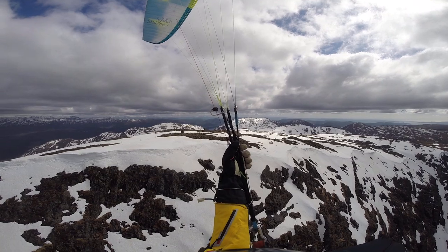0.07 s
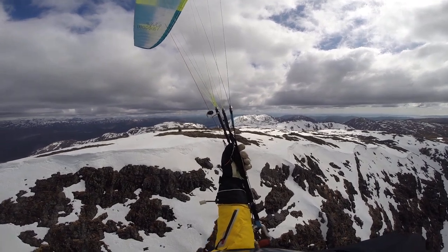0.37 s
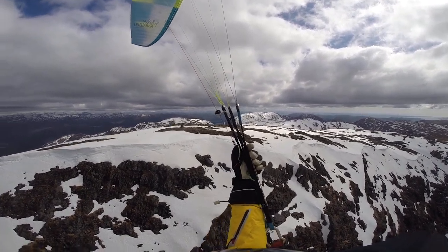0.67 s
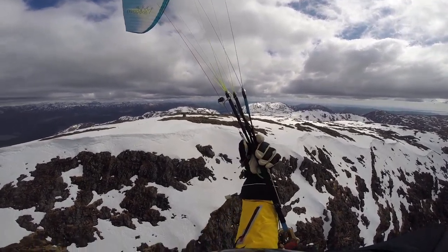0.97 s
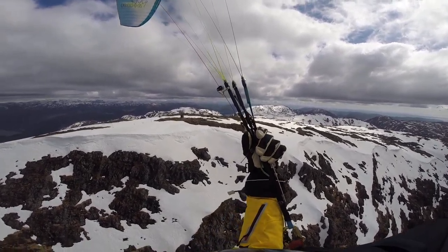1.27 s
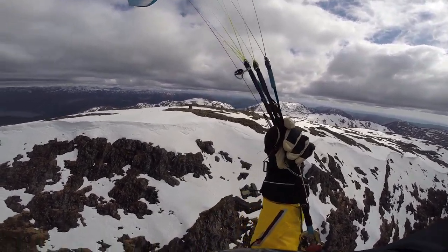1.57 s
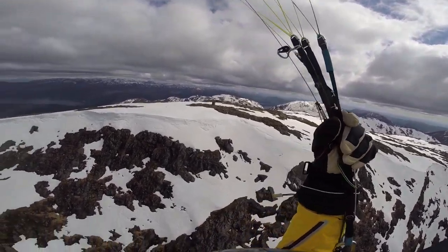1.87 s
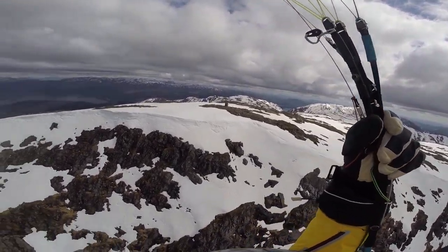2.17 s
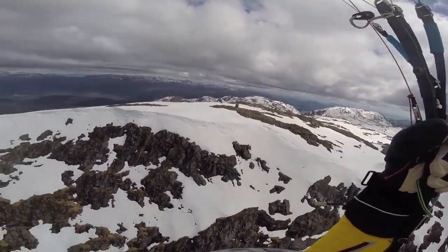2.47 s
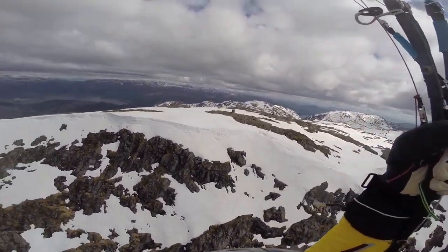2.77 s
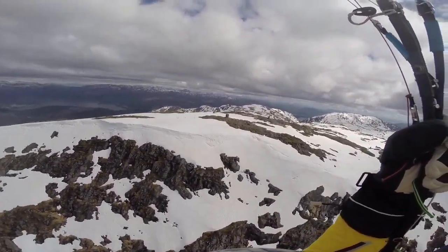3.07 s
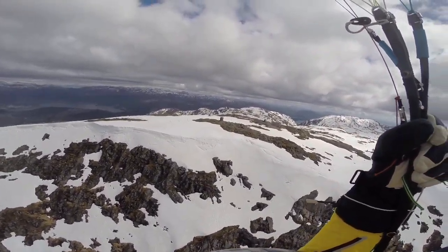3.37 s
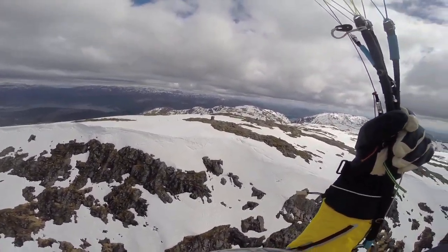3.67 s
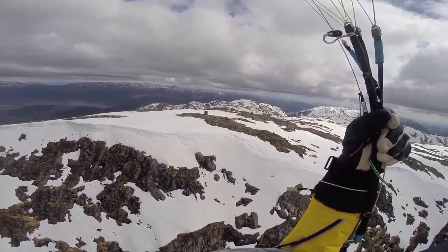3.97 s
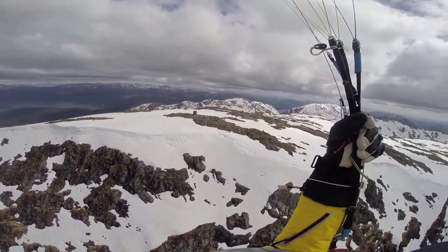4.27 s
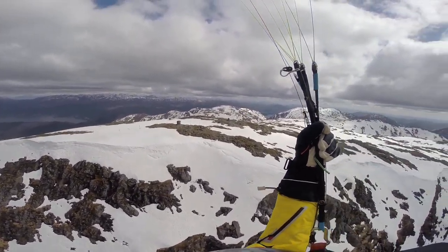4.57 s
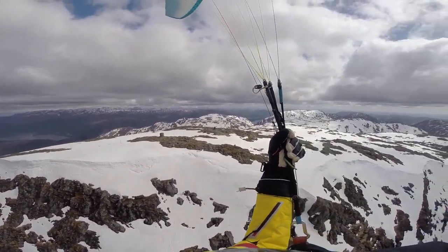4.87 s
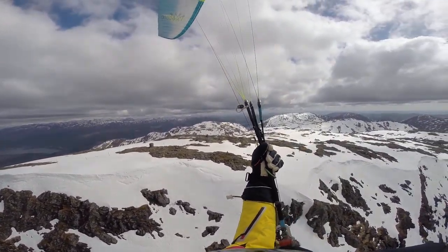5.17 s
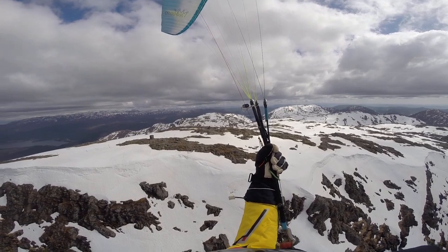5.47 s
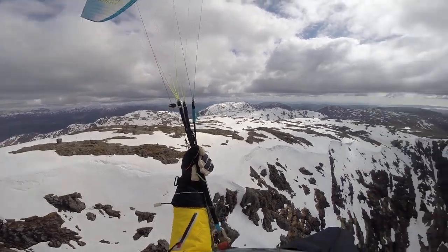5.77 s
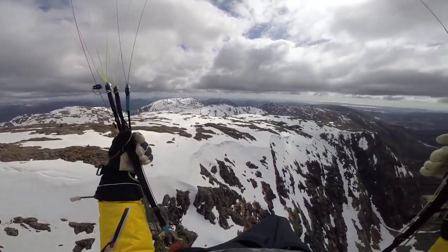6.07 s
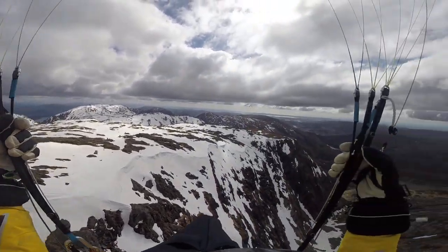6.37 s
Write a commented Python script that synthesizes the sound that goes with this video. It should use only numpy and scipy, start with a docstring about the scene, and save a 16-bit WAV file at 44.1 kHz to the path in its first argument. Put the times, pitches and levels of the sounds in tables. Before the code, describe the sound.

Heard from an enclosed camera on a gliding paraglider, the airstream swells quickly, buffeting the microphone with low booms while wavering whistles and a rough hiss come and go. After about three seconds the hiss fades and the wind settles into a quieter rush over a rumble, with a faint high whine from the camera. Toward the end come soft line whistles, another boom and a thin fluttering hiss as the rush grows.

```python
"""A paraglider flies over snowy mountains, heard from a camera in a closed housing.
The airstream rushes in and eddies buffet the housing into booms. For the first three seconds the air
catches an edge and hisses through the housing's resonances; early on a gap and the lines whistle.
Then the glider turns and the rush softens, baring a faint electronic whine. Near the end the lines
sing again, a thin hiss grazes the housing and the rush builds back up."""
import sys
import numpy as np
from scipy import signal
from scipy.fft import rfft, irfft, next_fast_len
from scipy.io import wavfile
from scipy.ndimage import map_coordinates

SR = 44100
rng = np.random.default_rng(int(sys.argv[2]) if len(sys.argv) > 2 else 0)


def to_wav(s):
    """Save 16-bit WAV."""
    ch = np.atleast_2d(s).T  # columns
    pcm = np.round(np.clip(ch, -1, 1) * 32767)  # PCM
    wavfile.write(sys.argv[1], SR, pcm.astype(np.int16))


N = 292824
T = np.arange(N) / SR

# strength of the airstream: t/s, level/dB
AIRSPEED_RIDE = [(0.08, -47), (0.35, -41.5), (0.58, -37.5), (0.92, -36.5), (1.72, -38.5), (2.05, -39.5),
                 (2.88, -39.5), (3.4, -44), (3.85, -46.0), (4.28, -46.0), (4.5, -47.5), (5.05, -45.5),
                 (5.42, -47.0), (5.75, -43.0), (6.1, -43), (6.52, -38), (6.64, -37)]
# the air swings to the side in the turn: t/s, share/0-1
SIDE_RIDE = [(4.25, 0.16), (4.6, 0.38), (5.4, 0.5), (5.85, 0.58), (6.25, 0.37), (6.42, 0.98)]
# tone of the rush: f/Hz, level/dB
RUSH_EQ = [(60, -26), (170, 3.5), (260, 4), (355, 4), (480, 0.5), (720, -4), (900, -0.5), (1250, 2),
           (1750, 2), (2500, 4.5), (3000, -4), (3800, -13), (5200, -19.5), (9000, -34.5), (15000, -48)]
# peaks and notches of the housing wall: f/Hz, width/Hz, gain/dB
WALL_MODES = [(359, 26, 3.5), (605, 36, 3.5), (880, 110, 2.5), (1210, 69, 2.5), (2017, 27, 7),
              (2176, 80, -3.5), (2460, 100, -2)]
# strength of the large eddies: t/s, level/dB
EDDY_RIDE = [(0.08, -45), (0.3, -38.5), (0.75, -36.5), (1.8, -36.5), (2.25, -32.5), (3.18, -30.5),
             (3.72, -35.5), (3.92, -33), (4.6, -39.0), (5.15, -35.5), (5.42, -46), (5.85, -42.5),
             (6.64, -34)]
# tone of their rumble: f/Hz, level/dB
RUMBLE_EQ = [(8, -24), (22, -0.5), (36, -2.5), (55, -1), (80, -2), (120, -9.5), (200, -24.5), (400, -30.5),
             (900, -62), (2000, -120)]
# eddies that set the mount booming: start/s, end/s, boost/dB
BOOM_CUES = [(0.163, .27, 7.5), (0.586, .84, 4.5), (1.24, 1.4, 6), (1.87, 1.98, 4.5), (2.549, 3.035, 4),
             (5.748, 5.94, 8)]
# tone of the edge hiss: f/Hz, level/dB
EDGE_EQ = [(600, -45), (1500, -5.5), (1850, -12), (2050, -2.5), (2300, 2), (2600, -4.5), (3000, -0.5),
           (3450, -2), (3800, -21), (5400, -14), (6500, -17.5), (7200, -26.5), (10000, -41), (15000, -49)]
# peaks and notches of the housing: f/Hz, width/Hz, gain/dB
HOUSING_MODES = [(2013, 68, 11.5), (2150, 82, -2.5), (2760, 105, 5), (3038, 94, 6), (3160, 130, -13),
                 (4067, 90, 13), (4320, 200, -3), (4690, 270, 4.5), (5200, 270, -4), (6260, 150, 7),
                 (7450, 330, 4), (9200, 520, 5.5)]
# the air catches the edge squarely: start/s, end/s, boost/dB
EDGE_CUES = [(.48, .75, 2), (.75, 1.22, 3), (1.22, 1.82, 4.3), (1.96, 2.47, 3.5), (2.62, 3.003, 5.7),
             (2.785, 2.88, 4), (3.197, 3.247, 11.5), (5.53, 5.78, 3.3)]
# air blows across a gap: start/s, end/s, steady level/dB, overblown level/dB
GAP_CUES = [(0.352, 0.606, -47.5, -55), (.62, 0.793, -40.5, -54), (0.855, 1.02, -41, -41.5),
            (1.057, 1.37, -48.5, -49), (1.372, 1.66, -45.5, -46.5), (1.68, 1.768, -43, -57)]
# the glider's lines at cruise: f/Hz, level/dB
LINE_TONES = [(1343, -56.5), (1661, -59.5)]
# a line sings out: start/s, end/s, f/Hz, level/dB
LINE_CUES = [(.6, 1.117, 1355, -47), (.62, 0.851, 1678, -45.5), (1.72, 1.86, 1350, -44),
             (5.24, 5.606, 1343, -55), (5.634, 5.825, 1347, -50.5), (5.74, 5.956, 1647, -49.5)]
# tone of the grazing hiss: f/Hz, level/dB
GRAZE_EQ = [(1500, -30), (3000, -4), (3700, 5), (4900, -13), (5700, -2), (6100, -2), (6380, 2), (6650, -4),
            (7500, -7.5), (8300, -17), (15000, -33)]
# air grazes the housing in the turn: start/s, end/s, level/dB
GRAZE_CUES = [(6.03, 6.372, -55), (6.478, 6.7, -57.5)]
# partials of the electronic whine: f/Hz, level/dB
WHINE_TONES = [(5846, -71), (8780, -80), (11687, -88), (11719, -88), (14626, -83.5)]

CRUISE_DB = -40  # airstream strength at cruise; flow is in dB above this


def airstream(flow, side, gust, flutter, base_db=-40):
    """The broad rush, coloured by the housing wall; brighter when the air is fast and head on."""
    air = noise(lambda f: eq_curve(RUSH_EQ, f) * mode_gain(WALL_MODES, f))
    lows = filtered(air, lambda f: 1 / (1 + (f / 800) ** 2))
    highs = air - lows
    bright_db = 0.17 * flow - 5 * side
    tilted = lows * amp(-bright_db) + highs * amp(bright_db + 0.77 * flutter)
    return amp(base_db + flow + 0.76 * gust) * tilted


def buffeting(flow, gust):
    """Large eddies rumble on the housing; they and the airstream set its mount booming."""
    eddy_db = ride(EDDY_RIDE)
    rumble = amp(eddy_db - 1.37 + 0.22 * gust) * noise(lambda f: eq_curve(RUMBLE_EQ, f))
    boost_db = sum(db * swell(start, end, rise_s=0.061, fall_s=0.14) for start, end, db in BOOM_CUES)
    boom_db = -40 + 0.5 * flow + 0.4 * (eddy_db - eddy_db.mean()) + boost_db
    boom = amp(boom_db) * noise(lambda f: resonance(f, hz=117.3, width=41) ** 2)
    return rumble + boom


def edge_hiss(flow, side, gust, flutter, spit_db=1.44, shelter_db=14):
    """Air tears off an edge in tiny bursts that ring the housing; two of its resonances sing."""
    boost_db = sum(db * swell(start, end, rise_s=0.048, fall_s=0.029) for start, end, db in EDGE_CUES)
    edge_db = -42.5 + 2.08 * flow - shelter_db * side + boost_db
    bursts = rng.standard_normal(N) * amp(spit_db * wobble(450) + 0.89 * flutter)
    hiss = unit(filtered(bursts, lambda f: eq_curve(EDGE_EQ, f) * mode_gain(HOUSING_MODES, f)))
    low_ring = amp(-9) * whistle(1992, width_hz=23, waver=0.00307)
    high_ring = amp(-17) * whistle(3060, width_hz=28, waver=0.003)
    return amp(edge_db + 0.94 * gust) * (hiss + low_ring + high_ring)


def gap_whistle(flow, gust, idle_db=-64.5):
    """Air across a gap blows a steady and an overblown note; the steady one lingers faintly."""
    steady_gain, overblown_gain = sum(amp(dbs)[:, None] * swell(start, end, rise_s=0.05, fall_s=0.059)
                                      for start, end, *dbs in GAP_CUES)
    steady = (steady_gain + amp(idle_db + flow)) * whistle(904, width_hz=28, waver=0.0076)
    overblown = overblown_gain * whistle(974, width_hz=28, waver=0.0076)
    return amp(0.47 * gust) * (steady + overblown)


def line_whistles(flow, gust):
    """The lines shed vortices, louder in faster air; now and then one sings out."""
    voices = [(hz, amp(db + 2.6 * flow)) for hz, db in LINE_TONES]
    for start, end, hz, db in LINE_CUES:
        voices.append((hz, amp(db) * swell(start, end, rise_s=0.08, fall_s=0.13)))
    return amp(0.31 * gust) * sum(gain * whistle(hz, width_hz=40, waver=0.0081) for hz, gain in voices)


def grazing_hiss(flutter):
    """A thin, fluttering hiss as the air swings round and skims the side of the housing."""
    gain = sum(amp(db) * swell(start, end, rise_s=0.18, fall_s=0.1) for start, end, db in GRAZE_CUES)
    return gain * amp(flutter) * noise(lambda f: eq_curve(GRAZE_EQ, f))


def electronics():
    """A faint bed of the camera's own whine and hiss, swelling in at the start."""
    whine = sum(amp(db) * np.sqrt(2) * np.sin(2 * np.pi * hz * T + 0.28 * wobble(25))
                for hz, db in WHINE_TONES)
    fuzz = amp(-73) * noise(lambda f: resonance(f, hz=5770, width=400) ** 2)
    hiss = amp(-72) * noise(lambda f: eq_curve([(7000, 2.5), (11500, -2), (14000, -7)], f))
    fade_in = amp(np.interp(T, [0.07, 0.14, 0.5], [-18, -7, 0]))
    return (whine + fuzz + hiss) * fade_in


def whistle(pitch_hz, width_hz, waver):
    """Vortex shedding: a breathy tone whose pitch wavers at random."""
    phase = 2 * np.pi * np.cumsum(pitch_hz * (1 + waver * wobble(14))) / SR
    narrow = lambda f: 1 / (1 + (f / width_hz) ** 2)
    return noise(narrow) * np.cos(phase) + noise(narrow) * np.sin(phase)


def noise(response):
    """Coloured noise of rms 1."""
    return unit(filtered(rng.standard_normal(N), response))


def filtered(x, response):
    """Run x through a frequency response, padded to leave room for the ring-out."""
    size = next_fast_len(N + SR // 2)
    return irfft(rfft(x, size) * response(np.fft.rfftfreq(size, 1 / SR)), size)[:N]


def eq_curve(points, hz):
    """Gain of an EQ drawn through (f/Hz, level/dB) points on a log axis."""
    f, db = np.transpose(points)
    return amp(np.interp(np.log(hz + 1), np.log(f + 1), db))


def mode_gain(modes, f):
    """A resonant body lifts some narrow bands and swallows others."""
    return np.prod([1 + (amp(db) - 1) * resonance(f, hz, width) for hz, width, db in modes], axis=0)


def resonance(f, hz, width):
    """A resonant band-pass with gain 1 at its centre."""
    return 1j * f * width / (hz * hz - f * f + 1j * f * width)


def ride(points):
    """A fader ride through (t/s, value) points."""
    return np.interp(T, *np.transpose(points))


def swell(start, end, rise_s, fall_s):
    """Attack, hold and release between 0 and 1, half open at start and end."""
    return np.clip(np.minimum(0.5 + (T - start) / rise_s, 0.5 + (end - T) / fall_s), 0, 1)


def wobble(rate):
    """Smooth random modulation, rate points a second."""
    return map_coordinates(rng.standard_normal(4096), [T * rate], mode="mirror")


def amp(db):
    """Decibels to gain."""
    return 10 ** (np.asarray(db) / 20)


def unit(x):
    """Scale to rms 1."""
    return x / np.sqrt(np.mean(x ** 2) + 1e-20)


def scene():
    """The mono mix: one airstream, with its gusts and fast flutter, drives the wind layers."""
    flow = ride(AIRSPEED_RIDE) - CRUISE_DB
    side = ride(SIDE_RIDE)
    gust, flutter = wobble(13), wobble(70)
    body = buffeting(flow, gust) + airstream(flow, side, gust, flutter)
    hiss = edge_hiss(flow, side, gust, flutter) + grazing_hiss(flutter)
    whistles = gap_whistle(flow, gust) + line_whistles(flow, gust)
    return (body + hiss + whistles + electronics())[None]


def record(dry):
    """A moment of silence, snap fades in and out, and a steep high cut."""
    start_s, high_cut_hz = 0.071, 14850
    fades = np.interp(T, [start_s, start_s + 0.009, T[-1] - 0.004, T[-1]], [0, 1, 1, 0])
    high_cut = signal.ellip(12, 0.1, 90, high_cut_hz, fs=SR, output="sos")
    return signal.sosfilt(high_cut, dry * fades)


dry = scene()
out = record(dry)
to_wav(out)
```